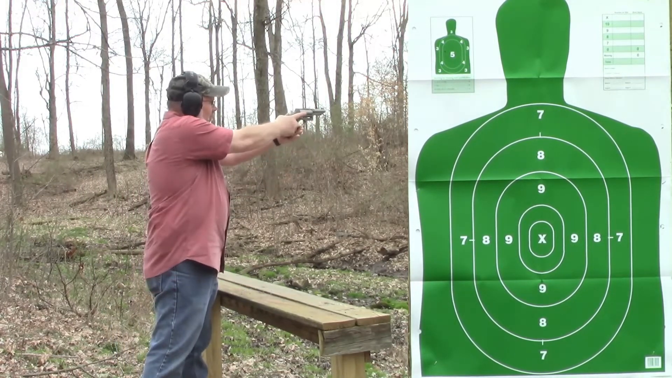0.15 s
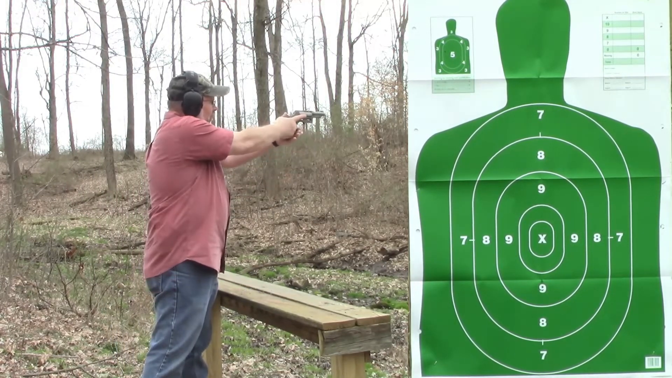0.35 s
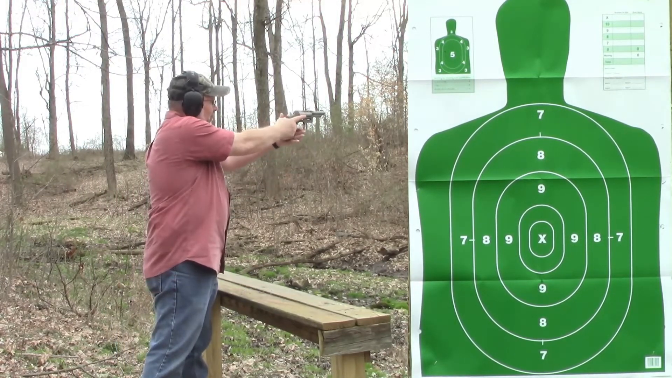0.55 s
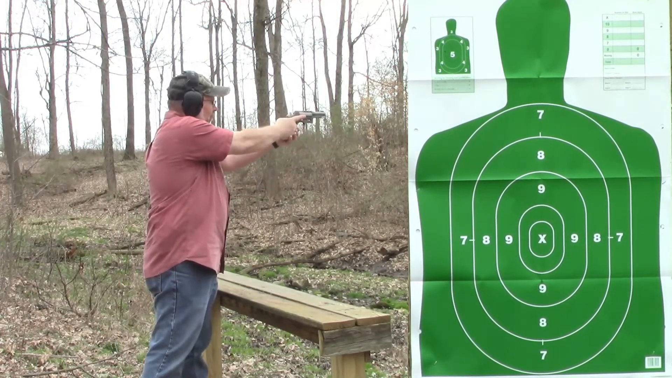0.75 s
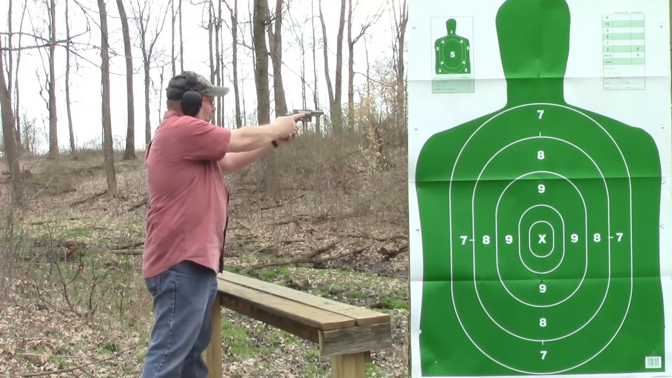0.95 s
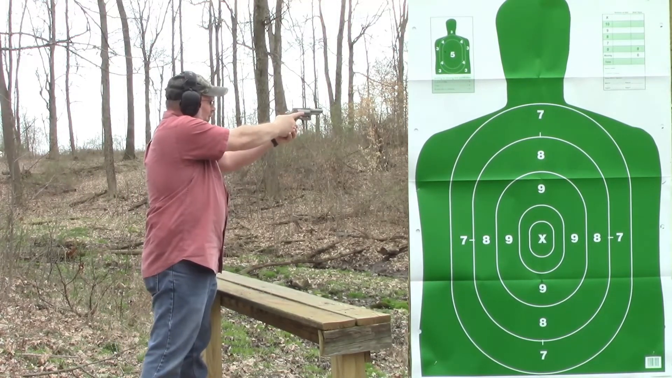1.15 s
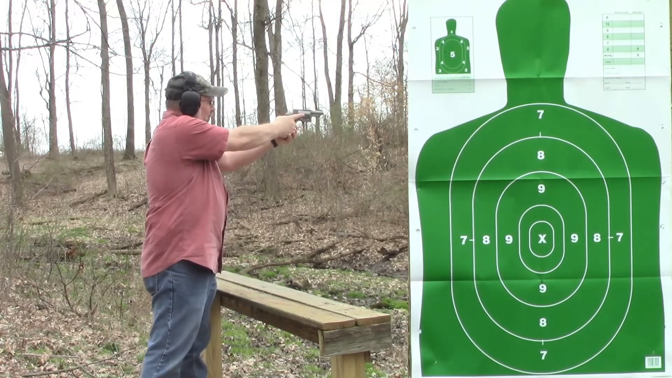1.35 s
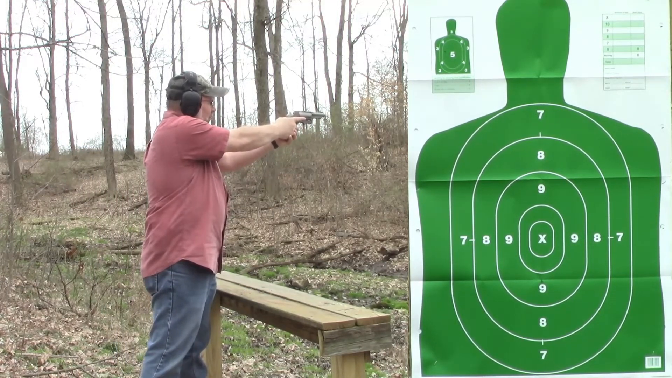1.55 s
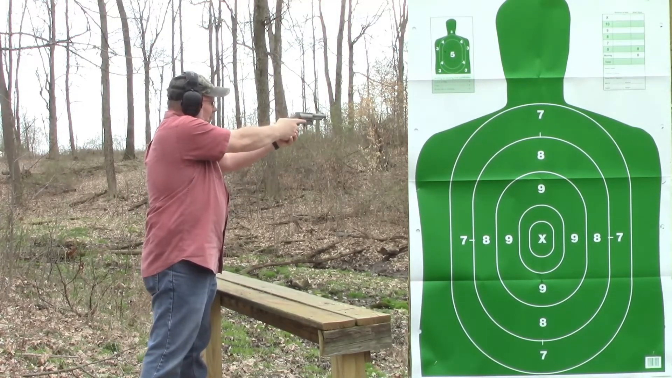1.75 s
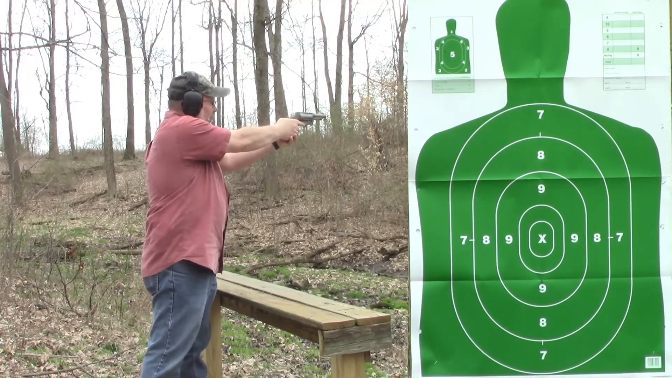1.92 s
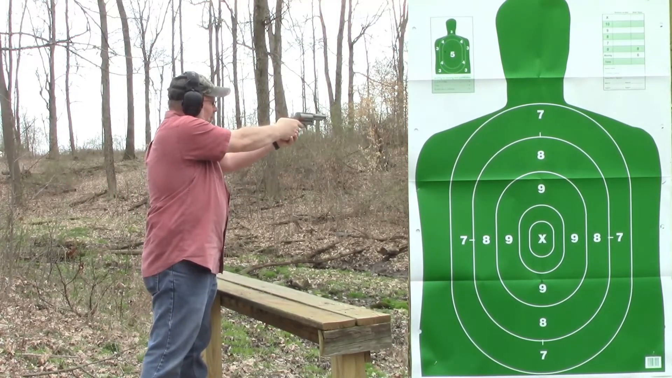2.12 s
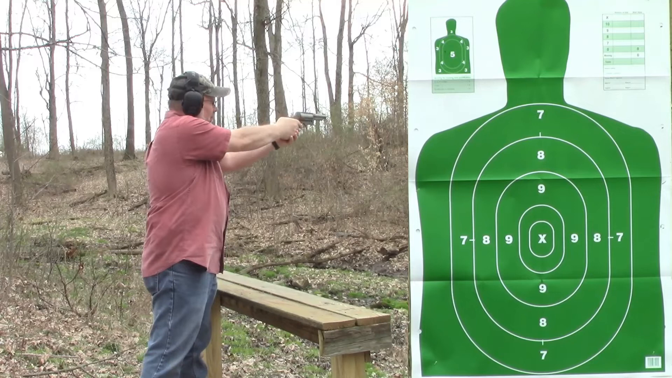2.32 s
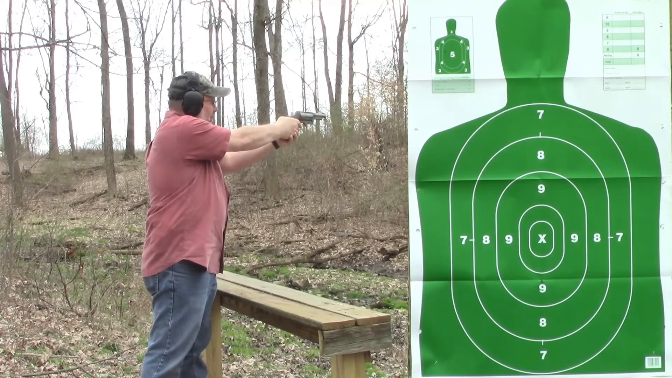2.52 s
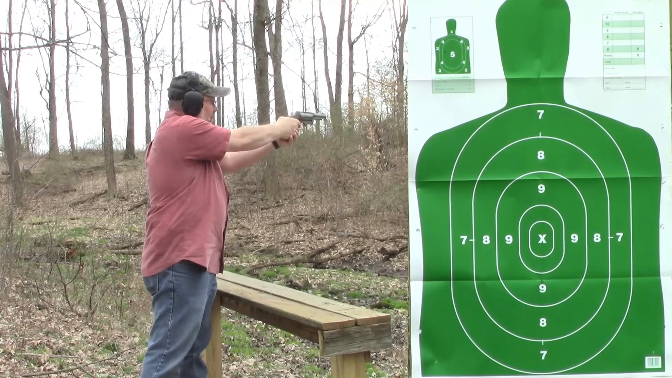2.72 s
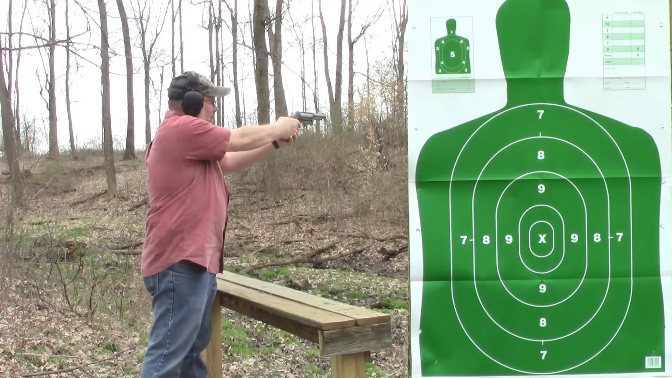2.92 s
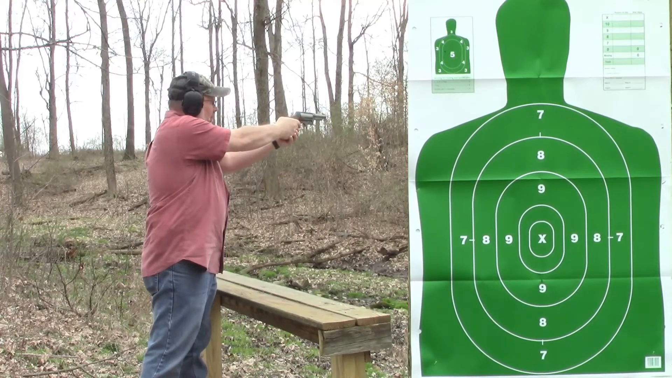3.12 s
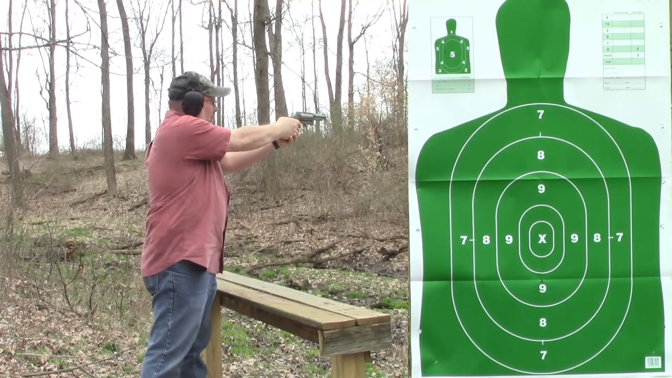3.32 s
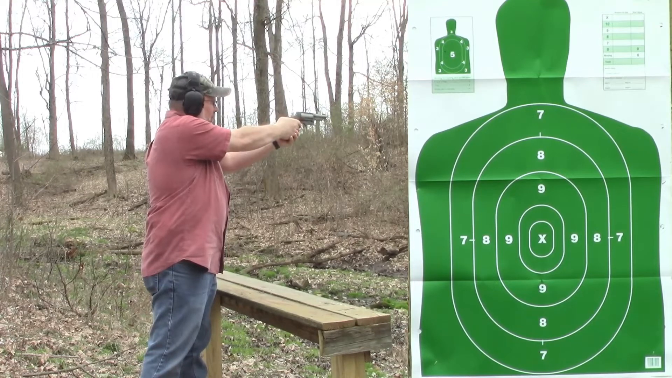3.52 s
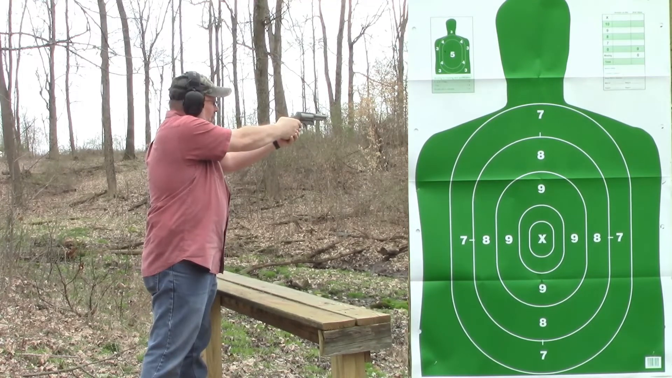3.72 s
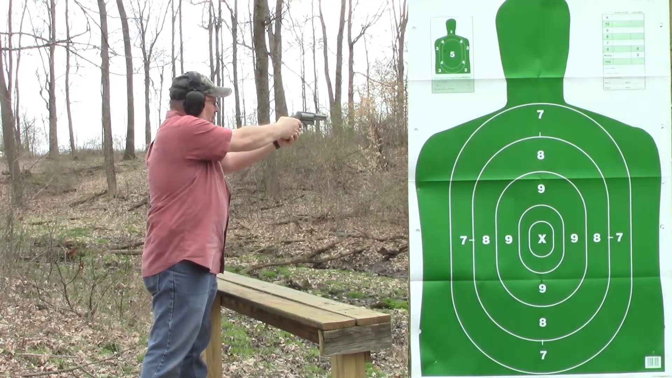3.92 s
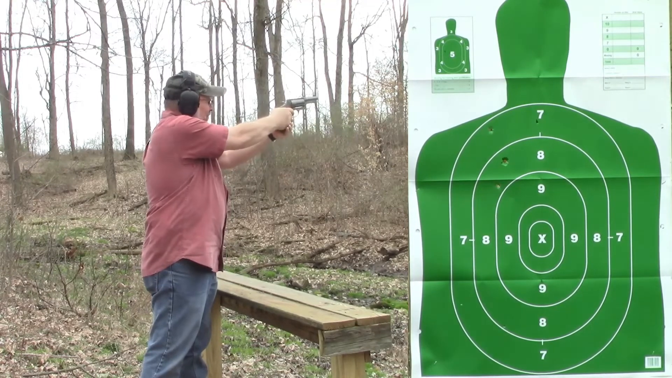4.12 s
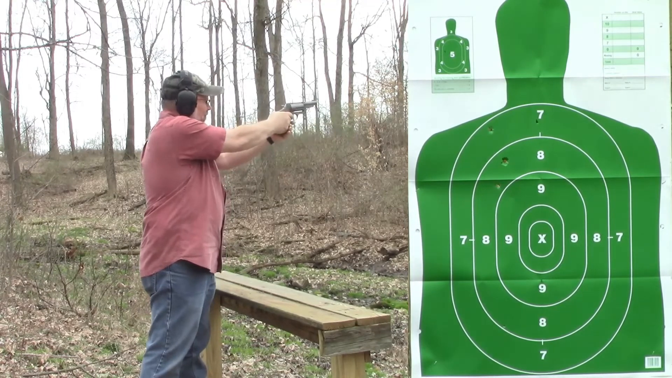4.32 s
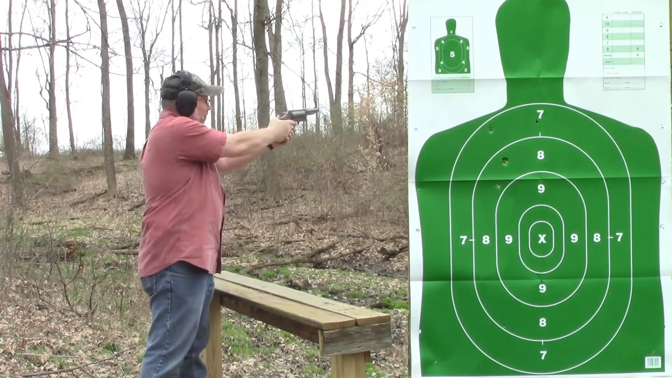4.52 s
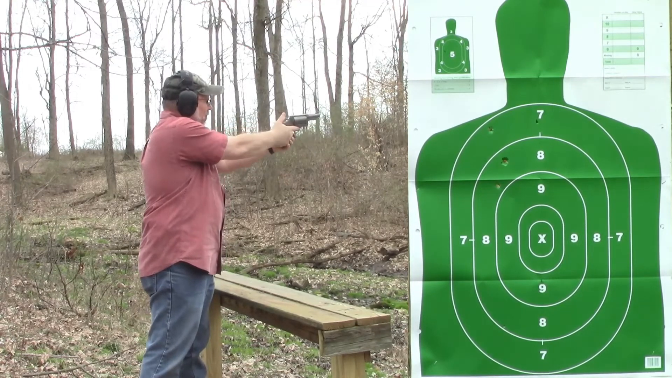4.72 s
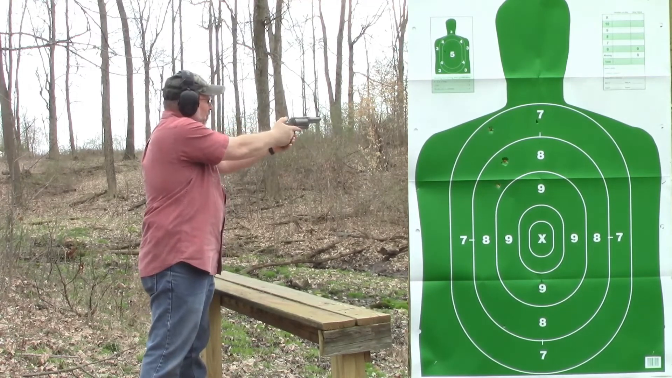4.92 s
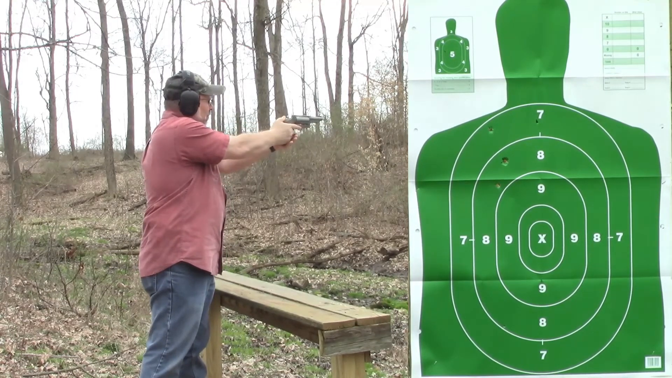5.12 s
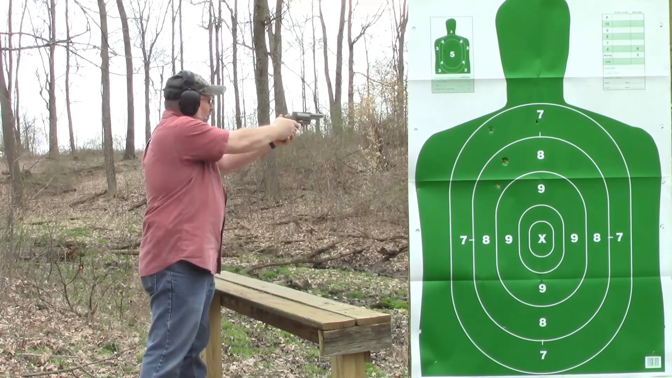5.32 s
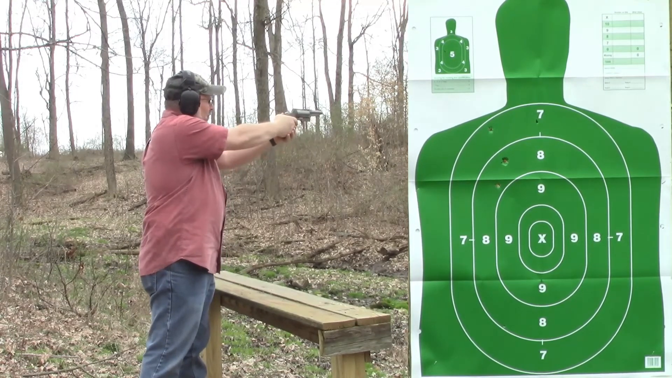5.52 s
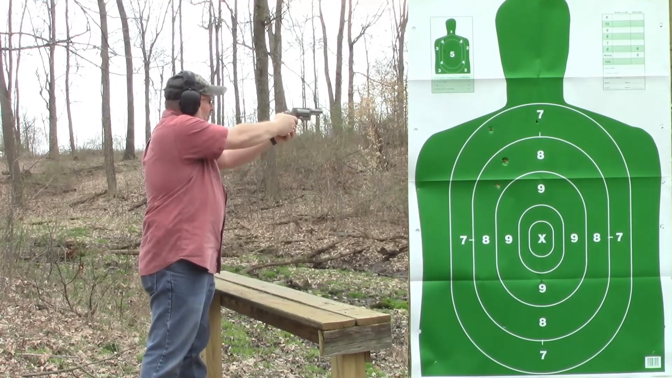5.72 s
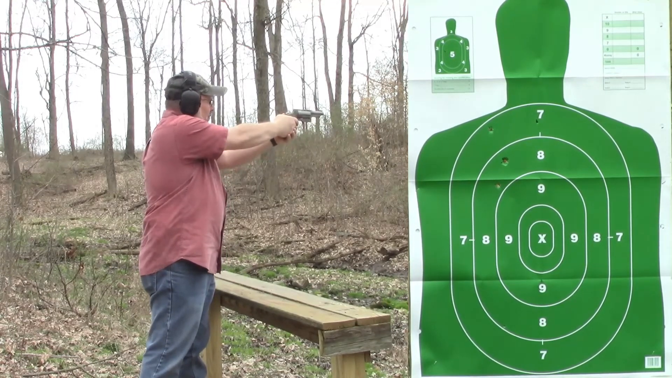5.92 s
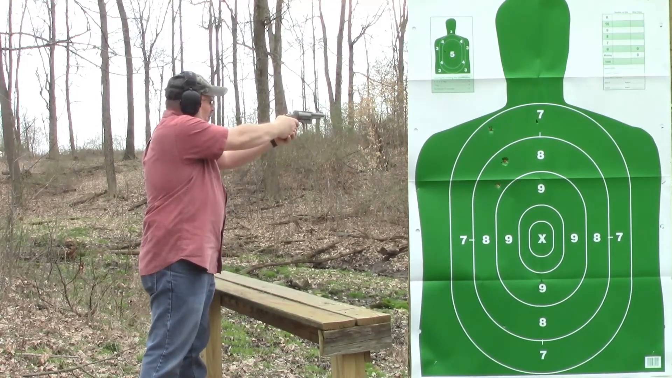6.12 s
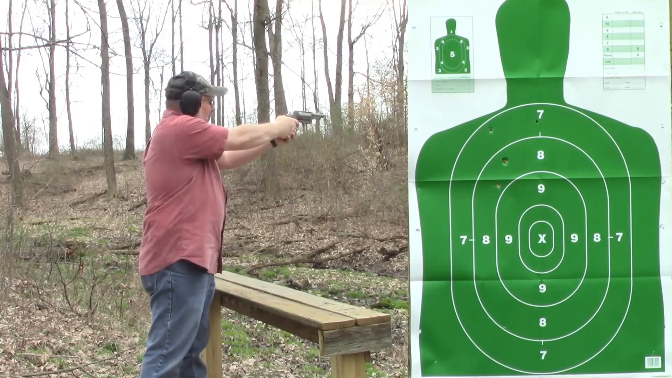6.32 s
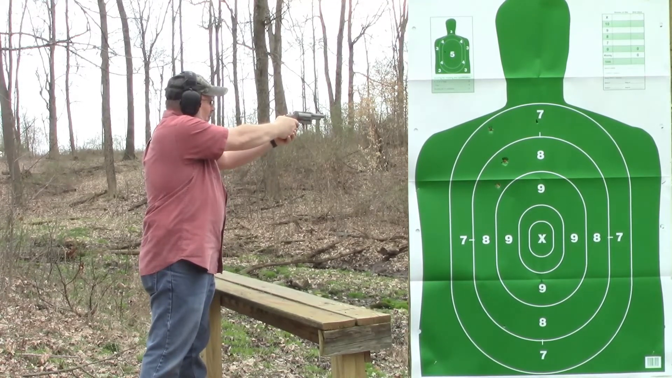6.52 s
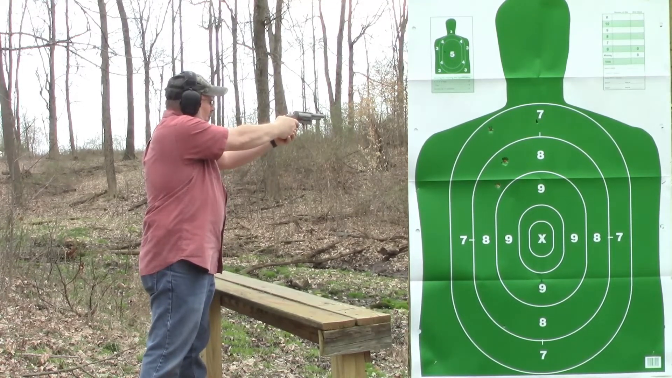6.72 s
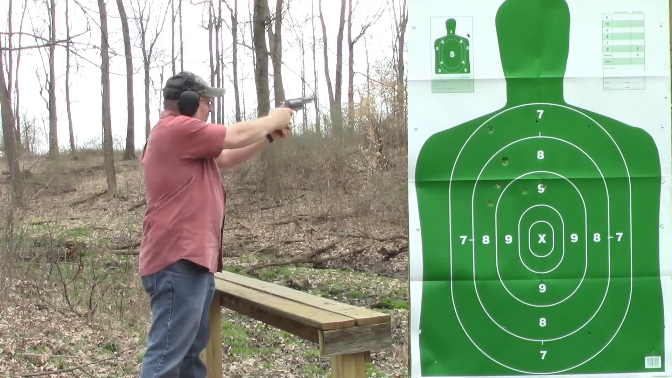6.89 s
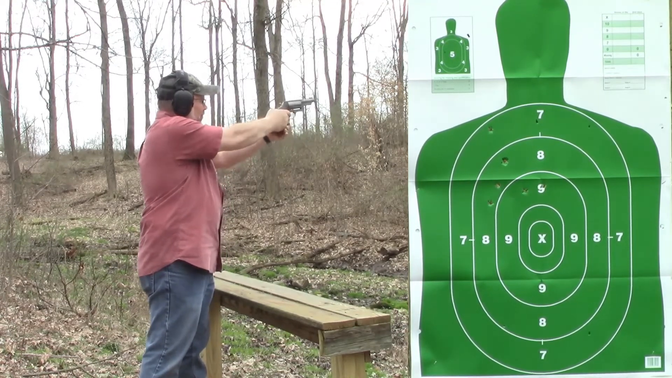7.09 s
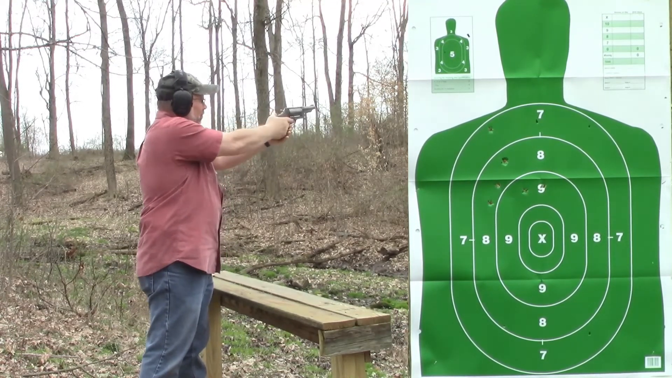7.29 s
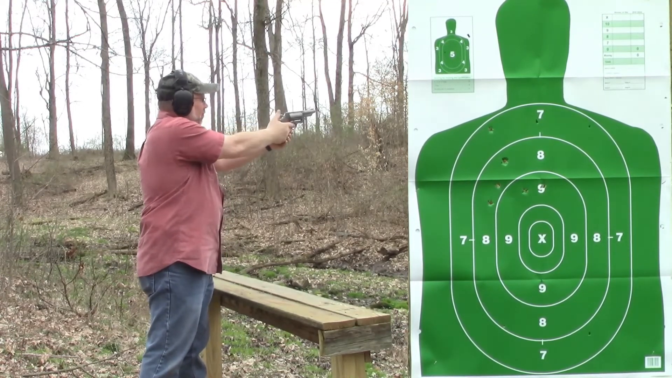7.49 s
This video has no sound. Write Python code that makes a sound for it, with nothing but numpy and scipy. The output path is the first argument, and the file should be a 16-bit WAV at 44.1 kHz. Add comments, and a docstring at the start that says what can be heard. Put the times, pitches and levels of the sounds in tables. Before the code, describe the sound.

A very soft, wide outdoor hush opens the scene. Small birds call far away, their short sliding chirps blurred by the trees, around 1.3 to 1.9 seconds and again from 2.5 to 3.8. Barely audible gun ticks occur near 0.8, 2.3 and 3.1. At about 3.96 a revolver fires close to the microphone, a cracking, clipped blast answered immediately by a loud, dense woodland roll that darkens and fades, with separate swells up to roughly 0.7 seconds later. Three quick light rattles come at 4.4. Cloth brushes faintly as bright steel cocking snaps cluster near 4.95 to 5.15, with smaller clicks at 5.55 and up to 5.95. Distant whistles and warbles return from 5.6 to 6.7. At 6.82 a second shot bursts out, with a nearly identical echo but stronger mid-range bark; rattles follow at 7.23, and the sound ends while the roll is still fading.

```python
"""Two revolver shots in bare woodland, heard from beside the shooter: each blast is a stack of filtered noise
bursts that overloads the recorder. Trunks and slopes answer with a long, darkening roll of noise, nearly the
same both times. Steel and frame resonances make the clicks of rattling and cocking; sleeves brush as grainy
hiss. Small birds, gliding sine tones drawn out by the trees, call far off over a hush of coloured noise."""
import sys
import numpy as np
from scipy import signal
from scipy.fft import rfft, irfft, next_fast_len
from scipy.io import wavfile

SR = 44100
rng = np.random.default_rng(int(sys.argv[2]) if len(sys.argv) > 2 else 0)


def unload_wav(signal):
    """Save mono or channel-first audio to the path in sys.argv[1] as 16-bit WAV at rate SR, clipped to [-1, 1]."""
    wavfile.write(
        sys.argv[1],
        SR,
        np.round(np.clip(np.atleast_2d(signal).T, -1, 1) * 32767).astype(np.int16),
    )


N = 332955
TIME = np.arange(N) / SR

# usual stereo spread: (frequency [Hz], side minus mid [dB])
SOUND_WIDTH = [(100, -30.5), (350, -43), (700, -28.5), (1400, -20), (2800, -14.5), (6000, -14.5),
               (14000, -16)]

# bird phrases, note by note: (time into the phrase [s], length [s], first pitch [Hz], last pitch [Hz],
# level [dB], rasp [0-1], how early the pitch settles [no unit]); each call scales pitch and level
SLUR = [(0, 0.0444, 3220, 2430, 1.5, 0.1, 9), (0.043, 0.06, 2330, 2070, -0.5, 0.01, 3.8)]
WHISTLE = [(0, 0.074, 2460, 2535, 0.0051, 0.024, 3)]
RISE = [(0, 0.05, 2250, 2560, 0.002, 0.1, 1.2)]
WARBLE = [(0, 0.04, 3720, 4110, -13, 0.08, 1.5), (0.024, 0.054, 2626, 2920, 0.5, 0.15, 2),
          (0.075, 0.07, 4590, 3705, -8, 0.12, 2)]
CHIP = [(0, 0.035, 2260, 3250, -5, 0.15, 0.3), (0.015, 0.02, 2350, 2320, 0.5, 0.15, 1.5)]
CHATTER = [(0, 0.028, 2756, 1990, 0.0056, 0.4, 1.2), (0.031, 0.028, 2763, 1987, 0, 0.4, 1.2)]


def undb(db):
    """Decibels to gain."""
    return 10 ** (np.asarray(db) / 20)


def unit(x):
    """Scale to rms 1."""
    return x / np.sqrt(np.mean(x ** 2))


def at_hz(table, hz):
    """Read (Hz, value) points on a log-frequency axis."""
    points, values = np.transpose(table)
    return np.interp(np.log(np.maximum(hz, 1)), np.log(points), values)


def resonance(hz, centre_hz, width_hz):
    """Complex response of one resonance, gain 1 at its centre."""
    return 1j * hz * width_hz / (centre_hz ** 2 - hz ** 2 + 1j * hz * width_hz)


def noise(colour, size, width=SOUND_WIDTH, side_db=0):
    """Stereo noise of rms 1 with gain colour(Hz); the width table sets how far the two sides part."""
    padded = next_fast_len(size)
    hz = np.fft.rfftfreq(padded, 1 / SR)
    mid, side = rfft(rng.standard_normal((2, padded)))
    side = side * undb(at_hz(width, hz) + side_db)
    left_right = np.array([mid + side, mid - side])
    return unit(irfft(left_right * colour(hz), padded)[:, :size])


def walk(rate, size):
    """Random levels joined by lines, rate of them a second."""
    return np.interp(TIME[:size] * rate, np.arange(8192), rng.standard_normal(8192))


def add(out, sound, start):
    """Mix a sound in at a time in seconds."""
    i = max(int(start * SR), 0)
    out[:, i:i + sound.shape[1]] += sound[:, :max(N - i, 0)]


def air(level_db=-60, drift_db=0.7, drift_rate=3):
    """Faint outdoor hush: coloured noise whose level drifts slightly, reaching the microphone from all round."""
    # spectrum of the hush: (frequency [Hz], relative level [dB per Hz])
    hush_colour = [(15, -37.5), (25, -11.5), (114, -6), (200, -13), (293, -8), (317, -9), (489, -9.5),
                   (659, -12.5), (714, -14), (988, -18), (2690, -27), (3820, -29.5), (9840, -37.5),
                   (16000, -53)]
    # stereo spread of the hush: (frequency [Hz], side minus mid [dB])
    hush_width = [(60, -19.5), (200, -12), (500, -18.5), (1300, -10), (4400, -9.5), (15000, -5)]
    drifting_db = level_db + drift_db * walk(drift_rate, N)
    hush = noise(lambda hz: undb(at_hz(hush_colour, hz)), N, width=hush_width)
    return hush * undb(drifting_db)


def rattles(count=3, gap_s=0.0175, loss_db=3, decay_s=0.0042, top_hz=15000, frame_db=-13.5):
    """The gun rattles coming down from recoil: even knocks that weaken ever faster, as rows of clicks."""
    # first knocks: (time [s], steel level [dB])
    first_knocks = [(4.378, -23.5), (7.227, -24)]
    knocks = []
    for start, db in first_knocks:
        for k in range(count):
            steel_db = db - loss_db * k * k
            knocks.append((start + k * gap_s, steel_db, steel_db + frame_db, decay_s, top_hz))
    return knocks


def action(ring_db=-30, ring_s=0.032, thud_db=-5, thud_s=0.0017, side_db=-10.5):
    """Hammer, pawl and cylinder scrape and snap: bursts in the gun's resonances with a faint after-ring."""
    # cocking and handling: (time [s], steel level before fading [dB], frame level before fading [dB],
    # decay [s], top of the contact's spectrum [Hz])
    clicks = [(0.7663, -57, -79, 0.002, 11000), (2.287, -75, -48, 0.0027, 4200),
              (2.3292, -61, -50.5, 0.002, 9000), (3.1465, -53, -64, 0.0016, 5500),
              (4.8966, -42, -65, 0.002, 12000), (4.917, -48, -62, 0.003, 12500),
              (4.9536, -29.5, -48, 0.0023, 13000), (4.987, -23, -11, 0.0015, 13000),
              (4.9901, -18.5, -26, 0.0042, 14300), (5.098, -45, -31, 0.003, 11400),
              (5.1476, -46, -57, 0.003, 13000), (5.162, -52, -37, 0.003, 13000),
              (5.5508, -40, -28.5, 0.0021, 9500), (5.557, -28.5, -34, 0.0018, 9700),
              (5.603, -52, -68, 0.004, 10020), (5.7965, -58, -51, 0.0041, 7000),
              (5.9418, -56, -41, 0.0047, 9500)]
    # resonances of the steel: (centre [Hz], width before squaring [Hz], relative level [dB])
    steel_modes = [(4050, 960, -1.5), (5390, 1700, -2), (7160, 370, -3.5), (9700, 2000, 2),
                   (10800, 700, -6.5), (12100, 600, -5)]
    # resonances of the frame: (centre [Hz], width before squaring [Hz], relative level [dB])
    frame_modes = [(800, 1000, -0.5), (1780, 360, -1), (3100, 1200, -10), (5070, 900, -23.5)]
    out, t = np.zeros((2, N)), TIME[:8192]
    for start, steel_db, frame_db, decay, top_hz in clicks + rattles():
        # contact builds up over a few tenths of a millisecond
        onset = 1 - np.exp(-t / 0.0002)
        fade = (np.exp(-t / decay) + undb(ring_db) * np.exp(-t / ring_s)) * onset
        for modes, db in ((steel_modes, steel_db), (frame_modes, frame_db)):
            def colour(hz):
                """Sum of the modes; a softer contact leaves the highest ones still."""
                body = sum(undb(g) * abs(resonance(hz, f, w)) ** 2 for f, w, g in modes)
                return body / (1 + (hz / top_hz) ** 10)

            # the gun is straight ahead, so its sides stay close
            click = noise(colour, len(t), side_db=side_db)
            add(out, click * fade * undb(db), start)
        # each knock also pushes the frame against the hand: one low pressure swing
        thud = np.sin(2 * t / thud_s) * np.exp(-t / thud_s)
        add(out, np.array([thud, thud]) * undb(frame_db + thud_db), start)
    return out


def notes():
    """Every bird call sings its phrase at its own pitch and level; rows as in the phrases, timed in the scene."""
    # calls: (time [s], phrase, pitch ratio, level added to the notes [dB])
    bird_calls = [(1.321, RISE, 0.99, -65), (1.402, SLUR, 0.97, -61), (1.648, RISE, 1.34, -78),
                  (1.783, RISE, 0.81, -67), (1.82, SLUR, 0.98, -60), (2.503, WHISTLE, 0.868, -71.5),
                  (2.618, CHIP, 1.27, -70), (3.03, CHIP, 0.97, -61), (3.182, CHIP, 0.91, -59),
                  (3.268, CHATTER, 1.0, -64), (3.333, CHATTER, 0.92, -64), (3.395, CHATTER, 1.0, -68.5),
                  (3.445, RISE, 1.13, -67), (3.553, CHIP, 1.0, -66.5), (3.716, CHIP, 0.95, -62.5),
                  (5.64, WARBLE, 1.02, -66), (5.956, WHISTLE, 1.01, -56.5), (6.09, WARBLE, 0.98, -58),
                  (6.32, WHISTLE, 0.7, -63), (6.46, WHISTLE, 1.02, -59), (6.59, WARBLE, 0.99, -62)]
    sung = []
    for start, phrase, pitch, db in bird_calls:
        for delay, length, first_hz, last_hz, note_db, rasp, settling in phrase:
            sung.append((start + delay, length, pitch * first_hz, pitch * last_hz,
                         db + note_db, rasp, settling))
    return sung


def birds(wet_db=-2.0, wood_t60=1.3, rasp_depth=0.25, trill_hz=28, side_db=5.5):
    """Whistles whose pitch slides and settles, shaking more when raspy; the trees draw each one out."""
    out = np.zeros((2, N))
    for start, length, first_hz, last_hz, db, rasp, settling in notes():
        u = np.linspace(0, 1, int(length * SR))  # progress through the note
        shake = np.sin(2 * np.pi * trill_hz * length * u) + walk(920, len(u))
        slide = np.expm1(-settling * u) / np.expm1(-settling)
        hz = (first_hz + (last_hz - first_hz) * slide) * (1 + rasp * rasp_depth * shake)
        whistle = np.sin(2 * np.pi * np.cumsum(hz) / SR)
        song = unit(whistle * np.sqrt(u * (1 - u)))
        add(out, undb(db) * np.array([song, song]), start)
    # birdsong rings round the wood: a wide, dying noise tail
    trees = noise(np.ones_like, size=32768, side_db=side_db)
    trees = trees * np.exp(-np.log(1000) * TIME[:trees.shape[1]] / wood_t60)
    trees = trees / np.linalg.norm(trees[0])
    return out + undb(wet_db) * signal.fftconvolve(out, trees, axes=1)[:, :N]


def roll_strength(t):
    """Gain of the roll t seconds after a blast: near ground, a short gap, then the wood and the far slopes."""
    # ground and bench around the shooter answer at once, then fall silent
    ground_db, ground_hold_s, ground_decay_s = -1.5, 0.068, 0.006
    # the wood answers from its edge on: it holds, then dies away
    wood_delay_s, wood_attack_s, wood_hold_s = 0.081, 0.0025, 0.14
    wood_db, wood_fall_db_per_s = -0.5, 27
    # far slopes linger beneath it
    slopes_db, slopes_fall_db_per_s = -17.5, 14
    ground = undb(ground_db) * np.exp(-np.maximum(t - ground_hold_s, 0) / ground_decay_s)
    reached = .5 + .5 * np.tanh((t - wood_delay_s) / wood_attack_s / 2)
    fading = np.maximum(t - wood_delay_s - wood_hold_s, 0)
    wood = undb(wood_db - wood_fall_db_per_s * fading)
    slopes = undb(slopes_db - slopes_fall_db_per_s * fading)
    return np.hypot(ground, reached * np.hypot(wood, slopes))


def scatter(patch_rate=350, patch_db=1.6, size=160000, echo_width=0.45):
    """The wood's answer: bunched noise for countless trunk echoes, darkening with path, and a few strong ones."""
    # colour of the roll at the start: (frequency [Hz], relative level [dB per Hz])
    roll_colour = [(30, -24.5), (80, -18), (150, -13), (225, -8.5), (340, -5), (480, 0), (700, -3),
                   (900, -6), (1200, -12.5), (1750, -11.5), (2600, -15.5), (5000, -18.5), (9000, -22.5),
                   (15000, -33.5)]
    # what ground and air take from the travelling sound: (frequency [Hz], loss [dB per s])
    path_loss = [(50, 9.5), (170, 19), (330, 1), (600, 1), (1500, 0.5), (2500, 10), (5000, 30.5),
                 (9000, 63), (15000, 89.5)]
    # single echoes from slopes and big trunks: (time after the blast [s], level against the shot [dB],
    # spread of the bell-shaped swell [s], centre [Hz])
    echoes = [(0.106, -4, 0.012, 561.6), (0.217, -4, 0.0049, 680), (0.268, -6, 0.0094, 640),
              (0.406, -9, 0.0093, 638.5), (0.451, -12, 0.0084, 700), (0.545, -16, 0.015, 520),
              (0.706, -7.5, 0.008, 609), (0.744, -14.5, 0.041, 634)]
    t = TIME[:size]
    bunching = undb(patch_db * walk(patch_rate, size))
    trunks = unit(noise(lambda hz: undb(at_hz(roll_colour, hz)), size) * bunching)
    hz, delay, frames = signal.stft(trunks, SR, nperseg=1024)
    # the loss grows with the length of the path
    darkening = undb(-np.outer(at_hz(path_loss, hz), delay))
    roll = signal.istft(frames * darkening, SR)[1][:, :size]
    roll = roll * roll_strength(t)
    for delay, db, length, centre_hz in echoes:
        # width is a share of the centre, before squaring
        echo = noise(lambda hz: resonance(hz, centre_hz, echo_width * centre_hz) ** 2, size=8192)
        middle = t[echo.shape[1] // 2]
        swell = np.exp(-.5 * ((t[:echo.shape[1]] - middle) / length) ** 2)
        # give the swelling noise the energy of the swell itself
        echo = echo * swell * np.sqrt(np.mean(swell ** 2) / np.mean((echo * swell) ** 2))
        add(roll, undb(db) * echo, delay - middle)
    return roll


def shots(changing=0.39, bark_hz=890, bark_octaves=0.45):
    """Noise bursts at the gun, then a roll both shots share as trees stand still; moving air alters a part."""
    # blasts: (time [s], level [dB], treble tilt above 600 Hz [dB per octave], bark of the roll [dB])
    blasts = [(3.964, -3, -1.03, 0.1), (6.8221, -4, -0.76, 3.5)]
    # hammer, cylinder gap gas, first thump, shock front, muzzle crack, push of the blast, gas hiss:
    # (time after the blast [s], level against the shot [dB], hold [s], decay [s], centre [Hz],
    # width before squaring [Hz])
    discharge = [(-0.013, -35.5, 0.0046, 0.002, 3280, 4605), (-0.0075, -15, 0.0085, 0.002, 2630, 5210),
                 (-0.0058, -4, 0.013, 0.0026, 654, 604), (0.0, -6.5, 0.0014, 0.0006, 6350, 7000),
                 (0.0, -3.5, 0.009, 0.003, 3000, 4800), (0.0, -18, 0.03, 0.01, 179.3, 220),
                 (0.0, -26, 0.029, 0.019, 3630, 6000)]
    out, standing = np.zeros((2, N)), scatter()
    for start, db, tilt_db, bark_db in blasts:
        roll = (standing + changing * scatter()) / np.hypot(1, changing)
        hz = np.maximum(np.fft.rfftfreq(roll.shape[1], 1 / SR), 1)
        octaves = np.log2(np.maximum(hz / 600, 1))
        # the hard middle of a report, stronger in one shot than in the other
        bark = np.exp(-.5 * (np.log2(hz / bark_hz) / bark_octaves) ** 2)
        tone = undb(db + tilt_db * octaves + bark_db * bark)
        add(out, irfft(rfft(roll) * tone), start)
        for delay, part_db, hold, decay, centre_hz, width_hz in discharge:
            burst = noise(lambda hz: resonance(hz, centre_hz, width_hz) ** 2, size=8192)
            fade = np.exp(-np.maximum(TIME[:burst.shape[1]] - hold, 0) / decay)
            add(out, burst * fade * undb(db + part_db), start + delay)
    return out


def sleeves(centre_hz=8000, width_hz=7000, grain_db=4.5, grain_rate=120):
    """Cloth rubbing on cloth: a faint, grainy hiss that swells and fades with each movement."""
    # arms coming down, thumb reaching up: (time of the peak [s], spread of the bell-shaped swell [s],
    # peak level before the grain [dB])
    brushes = [(4.618, 0.09, -75), (4.95, 0.1, -69), (5.346, 0.3, -72.5)]
    hiss = noise(lambda hz: resonance(hz, centre_hz, width_hz) ** 2, N)
    rubbing = sum(undb(db) * np.exp(-.5 * ((TIME - peak) / length) ** 2) for peak, length, db in brushes)
    return hiss * rubbing * undb(grain_db * walk(grain_rate, N))


def scene():
    """Gun, shooter, birds and air together."""
    return shots() + action() + sleeves() + birds() + air()


def record(dry, ceiling=.984, top_hz=15800):
    """The input stage clips the peaks of the blast flat; a steep low-pass cuts the top."""
    clipped = np.clip(dry, -ceiling, ceiling)
    low_pass = signal.ellip(10, .1, 60, top_hz, fs=SR, output="sos")
    return signal.sosfilt(low_pass, clipped)


dry = scene()
out = record(dry)
unload_wav(out)
```